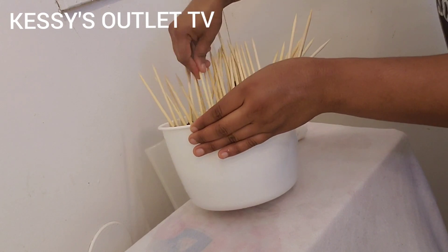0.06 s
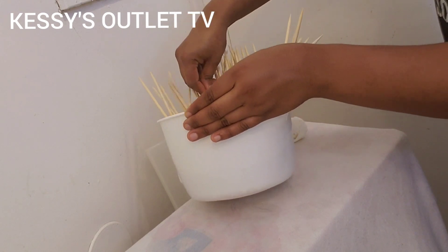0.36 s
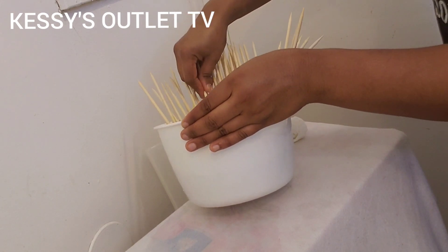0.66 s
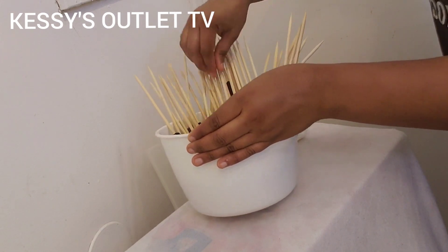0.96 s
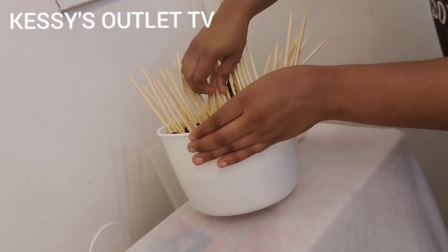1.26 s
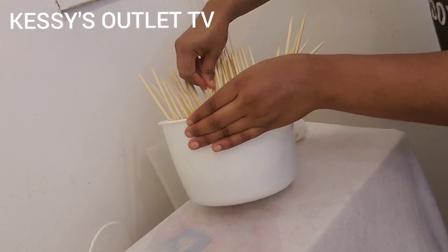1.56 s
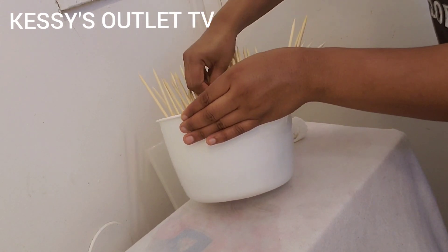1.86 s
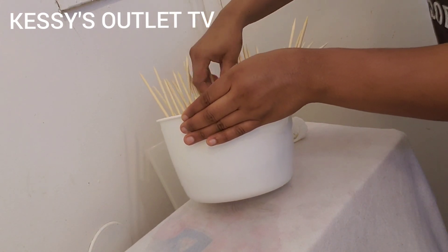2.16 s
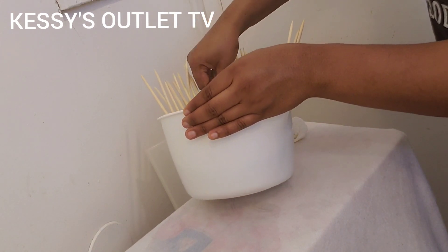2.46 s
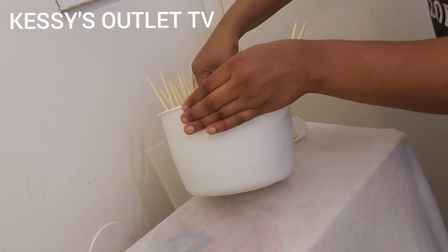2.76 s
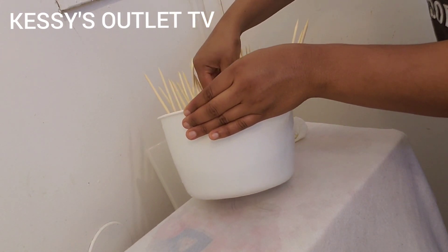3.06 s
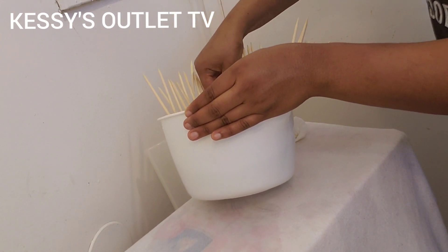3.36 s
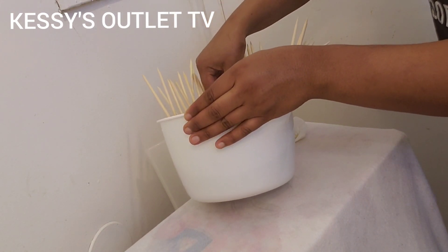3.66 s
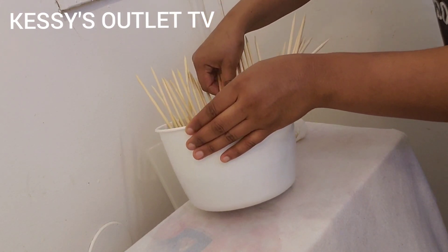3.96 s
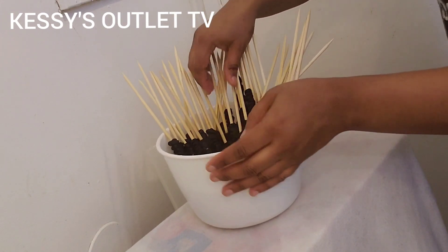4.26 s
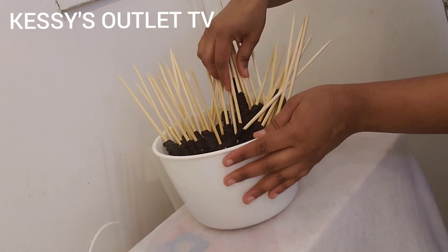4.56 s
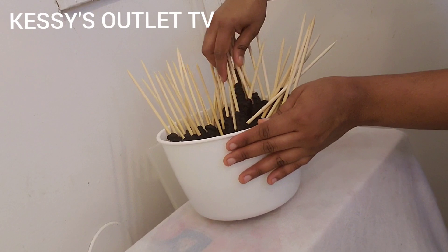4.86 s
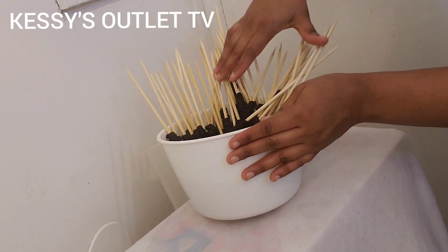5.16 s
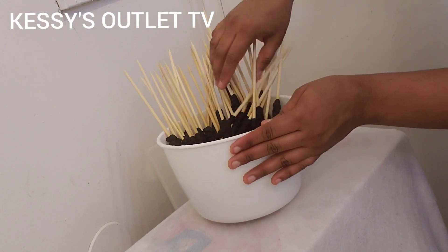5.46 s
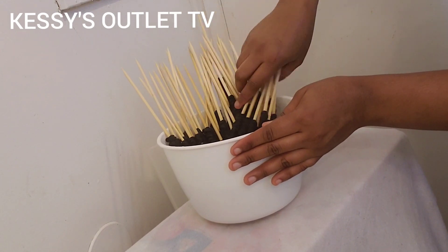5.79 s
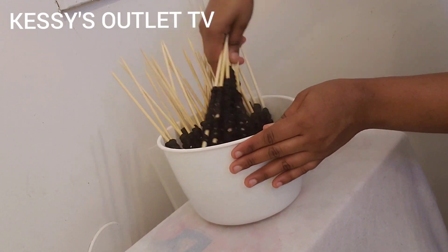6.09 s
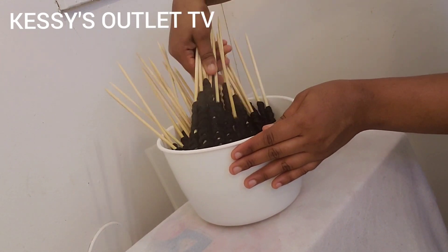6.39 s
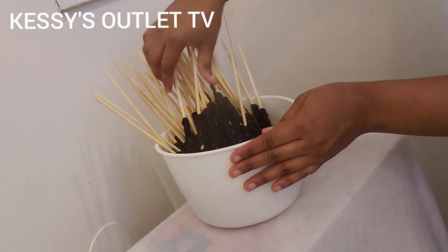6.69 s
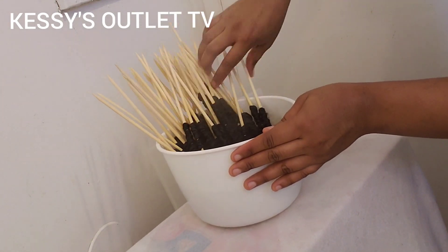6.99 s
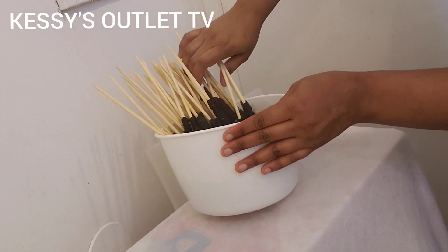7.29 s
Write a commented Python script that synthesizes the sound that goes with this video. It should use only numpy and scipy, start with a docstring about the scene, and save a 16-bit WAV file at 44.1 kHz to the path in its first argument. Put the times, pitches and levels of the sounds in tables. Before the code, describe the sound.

Bamboo sticks click and rustle close to the microphone as fingers stir them in a plastic bowl. Two early clusters of clacks each come with a dull bump of the bowl, followed by a quieter stretch of faint rubbing. Then the crisp ticks, hollow knocks and dry scrapes pick up and grow denser. Each contact rings briefly in a small room, over a faint hum.

```python
"""Coated bamboo skewers, rummaged by hand in a plastic bowl, heard by a close-set pair of microphones.
The thin tips snap past each other with sharp ticks, the thick ends knock together, the shafts scrape
in short strokes, and now and then the bowl bumps on the covered table.
The place is a small bare room: its walls ring on after every contact, over a faint low hum."""
import sys
import numpy as np
from scipy import signal
from scipy.fft import rfft, irfft
from scipy.io import wavfile

SR = 44100
rng = np.random.default_rng(int(sys.argv[2]) if len(sys.argv) > 2 else 0)


def to_wav(s):
    """Save 16-bit WAV."""
    ch = np.atleast_2d(s).T  # columns
    pcm = np.round(np.clip(ch, -1, 1) * 32767)  # PCM
    wavfile.write(sys.argv[1], SR, pcm.astype(np.int16))


N = 323253
BINS = abs(np.fft.fftfreq(2048, 1 / SR))  # Hz axis of the contact spectra
PITCH_HZ = 1100  # bending mode of a shaft of average free length


# Tips snapping past each other, above the bowl.
# Each row: start in seconds, level in dB, place of contact from 0 (mid-shaft) to 1 (thin tip).
TICKS = [(0.078, -41.5, 0.081), (0.401, -25, 0.36), (0.7783, -38.5, 0.25), (0.9511, -34.5, 0.36),
         (1.04, -28.5, 0.29), (1.108, -16, .9), (1.154, -24.5, 0.76), (1.516, -36, 0.053),
         (1.63, -18, 0.45), (2.294, -26, 0.55), (4.214, -26.5, 0.78), (4.901, -30, 0.46),
         (4.9441, -21, 0.46), (5.224, -20.5, 0.33), (5.2432, -22, 0.31), (5.307, -25.5, 1),
         (5.473, -29.5, 0.69), (5.7655, -22.5, 0.37), (5.779, -28, 0.67), (5.8454, -13.5, 0.76),
         (5.886, -20.5, 0.69), (5.927, -30.5, 0.7), (6.5256, -17, 0.76), (6.55, -15.5, 0.65),
         (6.716, -20.5, 0.55), (6.7352, -20.5, 0.89), (6.78, -12, 0.85), (6.8602, -31.5, 0.87),
         (6.921, -24, 0.73), (6.957, -30, 0.25), (7.1292, -27.5, 0.66), (7.24, -29.5, 0.48),
         (7.2552, -25, 0.71)]
# Spectra of a tip's snap and of a mid-shaft crack. Each row: frequency in Hz, level in dB.
SNAP_SPECTRUM = [(1600, -28), (2900, -7), (7300, -1), (8700, -9), (11000, -3), (15000, -4), (16200, -14)]
CRACK_SPECTRUM = [(100, -13), (260, 1), (400, -8), (1400, 1.5), (3000, -1.5), (6500, -4.5), (14000, -15.5)]

def ticks(slip_s=0.0009, buzz_s=0.00041, hidden_db=-28, ring_hz=(17000, 10800)):
    """A tip slips and snaps with a brief buzz and ring. Returns (to the microphones, into the room)."""
    direct, spread = np.zeros(N), np.zeros(N)
    for s, db, place in TICKS + stray_clicks():
        tip = np.clip(place, 0, 1)
        low_edge_hz = 15450 * amp(db) ** 0.69  # a harder snap is quicker and sounds thinner
        thin_db = -10 * np.log10(1 + (low_edge_hz / np.maximum(BINS, PITCH_HZ)) ** 4)
        ring_db = 6 * resonance(np.interp(tip, (0, 1), ring_hz), width=.13)  # longer free ends ring lower
        snap_db = read(SNAP_SPECTRUM, BINS) + thin_db + ring_db + ripple(depth_db=2, count=24)
        crack_db = read(CRACK_SPECTRUM, BINS) + ripple(depth_db=1.2, count=70)
        snap = tip * amp(db + 8) * impulse(snap_db)
        crack = (1 - 0.98 * tip) * amp(db + 6) * impulse(crack_db)
        buzz = rfft(rng.standard_normal(256) * np.exp(-np.arange(256) / SR / buzz_s))
        tick = signal.fftconvolve(snap + crack, irfft(buzz / abs(buzz)))
        # The bundle hides a mid-shaft contact from the microphones; a tip stands clear.
        direct_db = hidden_db * (1 - min(tip / 0.81, 1))
        add(direct, s + slip_s, tick * amp(direct_db / 2 + 2))
        add(spread, s + slip_s, tick * amp(-direct_db / 2))
    return direct, spread


def stray_clicks(above_effort_db=9, spread_db=4, count=80):
    """Other shafts click faintly at random, near mid-shaft, as the hand stirs: rows as in TICKS."""
    when, size, place = rng.random((count, 3)).T
    effort_db = 20 * np.log10(effort()[(when * N).astype(int)] + 1e-9)
    click_db = effort_db + above_effort_db + spread_db * np.log(size + 0.11)
    return list(zip(when * N / SR, click_db, place / 2))


# Thick ends meeting down in the bowl, dead when clamped and hollow when free.
# Each row: start in seconds, level in dB, pitch in Hz, height of the resonance in dB.
KNOCKS = [(0.318, -11.5, 1060, 7), (0.324, -15, 2210, -2), (0.3595, -11.5, 1480, 3.5),
          (0.377, -20, 1260, 8), (1.109, -25.5, 1600, 2.5), (1.297, -26.5, 1560, 13), (1.453, -23, 940, 13),
          (1.681, -18.5, 1340, 3), (2.212, -32.5, 1500, 14), (3.14, -27, 895, -4.5),
          (4.652, -31.5, 710, 12), (4.94, -25, 800, 4), (5.037, -28, 940, -2), (5.2329, -17, 900, 8),
          (5.451, -20, 1060, 14.5), (5.6191, -21, 1210, 18.5), (5.74, -26, 1110, 14),
          (5.7637, -15.5, 2850, 0), (6.243, -22.5, 1535, 31), (6.276, -26.5, 995, 26),
          (6.332, -26.5, 2220, 15), (6.447, -21.5, 1000, 10.5), (6.471, -21, 910, 8),
          (6.525, -26.5, 2320, 19), (6.698, -24, 950, 15), (6.721, -23.5, 1450, 33), (6.738, -25, 1070, 18),
          (6.789, -21, 1380, 10)]

def knocks(level_db=4, slip_s=0.000959, soft_hz=4500, chatter_db=-12, chatter_s=0.0044, scuff_s=0.0026):
    """Thick ends clack in two damped bending modes and jostle their neighbours; dead knocks scuff most."""
    out, age = np.zeros(N), np.arange(2048) / SR / scuff_s
    for s, db, hz, ring_db in KNOCKS:
        gain = amp(db + level_db)
        # The coating softens low knocks most.
        cushion_db = -10 * np.log10(1 + (BINS / soft_hz) ** 4 * (PITCH_HZ / hz) ** 2)
        overtone_db = .8 * ring_db * resonance(2.76 * hz, width=.1)
        clack_db = shaft(hz, ring_db, width=.18) + overtone_db + ripple(depth_db=1.5, count=60)
        add(out, s + slip_s, gain * impulse(clack_db + cushion_db))
        dull_knock = gain * impulse(shaft(hz, ring_db / 2, width=.17) + cushion_db)
        grit = rng.standard_normal(len(age)) * age * np.exp(-age)
        scuff = signal.fftconvolve(dull_knock, grit / np.linalg.norm(grit))
        add(out, s - slip_s, amp(-ring_db / 2) * scuff)
        for delay in rng.exponential(chatter_s, size=3):
            add(out, s + slip_s + delay, amp(chatter_db) * rng.choice([-1, 1]) * dull_knock)
    return out


# Spectrum of a coated shaft pitched at PITCH_HZ. Each row: frequency in Hz, level in dB.
SHAFT_SPECTRUM = [(60, -11.5), (300, -9), (780, -1), (1900, -5.5), (3200, -16.5), (6000, -33.5),
                  (14000, -37.5)]

def shaft(hz, ring_db, width):
    """A shorter free length shifts a shaft's whole spectrum up, and its bending mode with it (dB)."""
    return read(SHAFT_SPECTRUM, BINS * (PITCH_HZ / hz) ** 0.51) + ring_db * resonance(hz, width)


# The hand in the bundle, one curve for each grab. Each row of a curve: time in seconds, effort in dB.
GRABS = [
    [(0, -60), (.13, -49.5), (.28, -59.5), (.32, -35.5), (.38, -60), (.43, -94.5)],
    [(.76, -70), (.84, -44.5), (.93, -59.5), (1.04, -56), (1.12, -37.5), (1.19, -52.5), (1.37, -55),
     (1.52, -50), (1.83, -58.5)],
    [(1.9, -62.5), (2.14, -68), (2.29, -49), (2.35, -70), (2.6, -78), (2.78, -60), (2.84, -83)],
    [(3.12, -65), (3.31, -67), (3.42, -82)],
    [(4.25, -64), (4.84, -55), (4.96, -48.5), (5.19, -53), (5.26, -40), (5.34, -52.5), (5.58, -46.5),
     (5.69, -69)],
    [(5.73, -50), (5.79, -41), (5.92, -54), (6.21, -57.5), (6.42, -52), (6.55, -46), (6.67, -54.5),
     (6.76, -45), (6.88, -53.5), (6.97, -46.5), (7.06, -59.5), (7.19, -58), (7.25, -46), (7.34, -52)],
]

def effort():
    """How hard the bundle is stirred, as a gain; it rests between grabs."""
    t = np.arange(N) / SR
    return sum(amp(np.interp(t, *np.transpose(grab), left=-np.inf, right=-np.inf)) for grab in GRABS)


def scraping(level_db=-4, scatter_octaves=0.42, count=120, size=8192):
    """As the hand stirs, shaft after shaft drags its coated end along the rest, each at its own pitch."""
    out, step_s = np.zeros(N + size), N / SR / count
    swell = np.cos(np.pi / 2 * np.minimum(abs(np.arange(size) / SR / step_s - 1), 1))
    for k in range(count + 1):
        hz = PITCH_HZ * 2 ** (scatter_octaves * np.clip(rng.standard_normal(), -2, 2))
        colour_db = shaft(hz, ring_db=7, width=.22) + ripple(depth_db=2, count=110)
        add(out, k * step_s, swell * friction(colour_db, catches_per_s=450, uneven_db=4, size=size))
    return amp(level_db) * effort() * out[round(step_s * SR):][:N]


# Bare shafts brushing past the fingers. Each row: middle in seconds, level in dB.
BRUSHES = [(.36, -40.5), (1.249, -47), (1.41, -51), (2.771, -64), (4.179, -43.5), (4.627, -49),
           (4.777, -48)]
# Spectrum of bare bamboo sliding. Each row: frequency in Hz, level in dB.
HISS_SPECTRUM = [(2000, -12), (2800, -6.5), (7600, -2.5), (9000, -10.5), (12000, -3), (16000, -11)]

def hissing(stir_db=-10, brush_db=-7, brush_s=0.025):
    """Bare shafts hiss with the effort of the hand, and swell where fingers brush them."""
    t = np.arange(N) / SR
    brushed = sum(amp(db + brush_db) * np.exp(-((t - s) / brush_s) ** 2) for s, db in BRUSHES)
    hiss = friction(read(HISS_SPECTRUM, BINS), catches_per_s=2500, uneven_db=4.5, size=N)
    return (amp(stir_db) * effort() + brushed) * hiss


# Single shafts drawn through the bundle. Each row: middle in seconds, level in dB, pitch in Hz.
RUBS = [(0.752, -57, 2350), (.81, -46.5, 1880), (1.99, -57, 1430), (2.111, -61.5, 1570),
        (2.444, -59.5, 1220), (2.75, -65.5, 1390), (3.051, -66, 976), (4.51, -47.5, 1320)]

def rubbing(level_db=-5, stroke_s=0.029, size=8192):
    """A lone shaft slides along its neighbours, swelling and fading in a short hollow rub."""
    out, t = np.zeros(N), (np.arange(size) - size / 2) / SR
    swell = np.exp(-(t / stroke_s) ** 2)
    for s, db, hz in RUBS:
        rub = friction(shaft(hz, ring_db=15, width=.54), catches_per_s=500, uneven_db=5, size=size)
        add(out, s + t[0], amp(db + level_db) * swell * rub)
    return out


def friction(colour_db, catches_per_s, uneven_db, size):
    """Stick and slip: a train of tiny catches of uneven size, rms 1."""
    strength = amp(uneven_db * np.minimum(rng.exponential(1, size), 3)) * rng.choice([-1, 1], size)
    catches = strength * (rng.random(size) < catches_per_s / SR)
    return unit(signal.fftconvolve(catches, impulse(colour_db))[:size])


# The bowl bumping on the covered table. Each row: start in seconds, level in dB.
BUMPS = [(0.361, -33), (1.111, -36), (4.326, -45)]
# Spectrum of one bump. Each row: frequency in Hz, level in dB.
BUMP_SPECTRUM = [(30, -17), (70, -1), (130, 6), (220, -6), (370, -2.5), (900, -38.5), (4000, -81)]

def bowl_bumps(level_db=17):
    """The hand-damped bowl answers a cushioned bump with a short low push."""
    out, bump = np.zeros(N), impulse(read(BUMP_SPECTRUM, BINS))
    for s, db in BUMPS:
        add(out, s, amp(db + level_db) * bump)
    return out


def near_paths(x, left_lead_s, wall_s=0.0016, wall_db=-10):
    """The straight path and a first bounce off the wall; the left microphone is slightly closer."""
    out, hz = np.zeros((2, N)), np.fft.rfftfreq(N, 1 / SR)
    for channel, lag in zip(out, (0, left_lead_s)):
        add(channel, 0, irfft(rfft(x) * np.exp(-2j * np.pi * lag * hz), N))
        add(channel, wall_s * rng.uniform(1, 2.5), amp(wall_db) * x)
    return out


# Standing waves between the bare walls. Each row: frequency in Hz, level in dB.
ROOM_MODES = [(353, 11), (385, 2), (622, -7), (708, 1.5), (793, 2), (866, 11.5)]
# Reverberation of the small room. Each row: frequency in Hz, seconds to fall by 60 dB.
ROOM_T60 = [(300, 0.6), (1000, 0.34), (2800, 0.35), (14000, 0.23)]

def room(x, echo_db=2, modes_db=-17, poses_per_s=20, poses=6):
    """The walls ring with steady standing waves, and with echoes that change as the hands move."""
    t, waves = np.arange(SR) / SR, 0
    for hz, db in ROOM_MODES:
        mic_phase = np.arccos(read(COHERENCE, hz)) * np.array([[0], [rng.choice([-1, 1])]])
        decay = amp(db - 60 * t / read(ROOM_T60, hz))
        waves = waves + decay * np.sin(2 * np.pi * (hz * t + rng.random()) + mic_phase)
    out = signal.oaconvolve(x[None], amp(modes_db) * unit(waves), axes=1)[:, :N]
    pose = np.arange(N) / SR * poses_per_s
    for k in range(poses):  # each pose of the hands fades into the next
        share = np.cos(np.pi / 2 * np.minimum(abs((pose + k) % poses - poses / 2), 1))
        out += signal.oaconvolve((x * share)[None], amp(echo_db) * echoes(), axes=1)[:, :N]
    return out / np.sqrt(SR)


def echoes(early_db=4, early_s=0.012, onset_s=0.00073):
    """The room's diffuse response at the microphones, strongest in its first echoes."""
    t = np.arange(SR) / SR
    hz, frame_s, frames = signal.stft(diffuse_noise(SR), SR)
    decay = amp(-60 * frame_s / read(ROOM_T60, hz)[:, None])
    tail = signal.istft(frames * decay, SR)[1][:, :SR]
    onset = 1 - np.exp(-(t / onset_s) ** 2)
    return unit(tail * onset * amp(early_db * np.exp(-t / early_s)))


# Likeness of diffuse sound at the two microphones. Each row: frequency in Hz, coherence from 0 to 1.
COHERENCE = [(60, 0.98), (400, 0.71), (1000, 0.23), (2000, 0.012)]

def diffuse_noise(size):
    """Noise from all sides reaches two close-set microphones alike in the bass, unlike in the treble."""
    a, b = rng.standard_normal((2, size))
    coherence = read(COHERENCE, np.fft.rfftfreq(size, 1 / SR))
    mid = rfft(a) * np.sqrt((1 + coherence) / 2)
    side = rfft(b) * np.sqrt((1 - coherence) / 2)
    return irfft(np.array([mid + side, mid - side]), size)


def thin_bass(x, null_hz=260, null_db=-9, null_width=0.041, low_hz=55):
    """The microphones stand in a null of the room, and the small bowl radiates no deep bass."""
    hz = np.fft.rfftfreq(N, 1 / SR)
    notch_db = null_db / (1 + ((hz / null_hz - 1) / null_width) ** 2)
    notched = irfft(rfft(x) * amp(notch_db), N)
    return signal.sosfilt(signal.butter(2, low_hz, "high", fs=SR, output="sos"), notched)


# Still air all round the microphones. Each row: frequency in Hz, level in dB.
AIR_SPECTRUM = [(20, -15.5), (70, -19), (104, -3.5), (138, -17.5), (168, -12), (255, -31), (377, -19),
                (542, -34), (16000, -44)]
# Low hum, the same at both microphones. Each row: centre in Hz, half-width in Hz, level in dB.
HUM_BANDS = [(72, 8, -66), (135, 9, -65)]

def room_tone(air_db=-66):
    """Still air, and narrow bands of noise heard as a wavering low hum."""
    hz, hum = np.fft.rfftfreq(N, 1 / SR), 0
    air = irfft(rfft(diffuse_noise(N)) * amp(read(AIR_SPECTRUM, hz)), N)
    for centre, width, db in HUM_BANDS:
        band = rfft(rng.standard_normal(N)) / (1 + ((hz - centre) / width) ** 4)
        hum = hum + amp(db) * unit(irfft(band, N))
    return amp(air_db) * unit(air) + hum


def ripple(depth_db, count):
    """Every shaft is touched at another spot, which ripples its spectrum at random (dB)."""
    return depth_db * np.interp(BINS, np.linspace(0, SR / 2, count), rng.standard_normal(count))


def resonance(hz, width):
    """The shape of a resonance at BINS, 1 at its top; the width is a share of its pitch."""
    return 1 / (1 + ((BINS / hz - 1) / width) ** 2)


def impulse(db):
    """The causal impulse response, with energy 1, of a spectrum given in dB at BINS."""
    minimum_phase = np.exp(np.conj(signal.hilbert(np.log(amp(db)))))
    response = np.fft.ifft(minimum_phase).real[:len(db) // 2]
    return response / np.linalg.norm(response)


def amp(db):
    """Decibels to gain."""
    return 10 ** (np.asarray(db) / 20)


def unit(x):
    """Scales to rms 1."""
    return x / np.sqrt(np.mean(x ** 2) + 1e-20)


def read(points, hz):
    """Reads a table on a log-frequency axis."""
    f, value = np.transpose(points)
    return np.interp(np.log(hz + 1), np.log(f + 1), value)


def add(mix, s, sound):
    """Mixes a sound in at time s."""
    part = mix[max(round(s * SR), 0):][:len(sound)]
    part += sound[:len(part)]


def scene(blow_room_db=1, slide_room_db=-3):
    """Every contact reaches the microphones directly and through the room, over the room tone."""
    ticks_direct, ticks_spread = ticks()
    blows = knocks() + bowl_bumps()
    slides = hissing() + scraping() + rubbing()
    near = near_paths(ticks_direct, left_lead_s=.5 / SR) + near_paths(blows + slides, left_lead_s=2 / SR)
    reverberation = room(ticks_spread + amp(blow_room_db) * blows + amp(slide_room_db) * slides)
    return thin_bass(near + reverberation) + room_tone()


# Colour of the microphone pair. Each row: frequency in Hz, left minus right in dB.
MIC_TILT = [(150, -1.2), (500, 0.8), (1300, 0), (4500, 3.5), (9500, -0.5)]

def record(dry, top_hz=16100):
    """Each microphone colours the sound in its own way; then the highest treble is cut."""
    tilt_db = read(MIC_TILT, np.fft.rfftfreq(N, 1 / SR)) * np.array([[.5], [-.5]])
    coloured = irfft(rfft(dry) * amp(tilt_db), N)
    lowpass = signal.firwin(255, top_hz, window=("kaiser", 8), fs=SR)
    return signal.oaconvolve(coloured, lowpass[None], "same")


dry = scene()
out = record(dry)
to_wav(out)
```